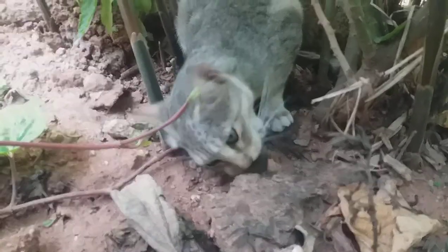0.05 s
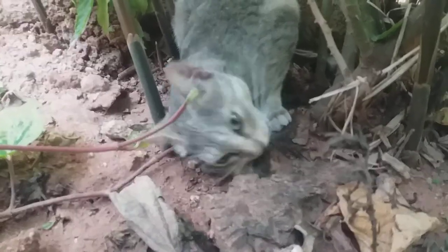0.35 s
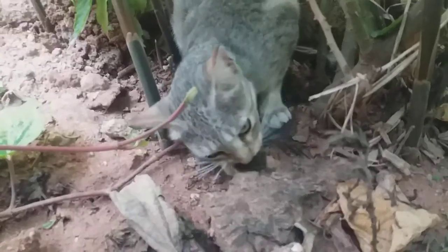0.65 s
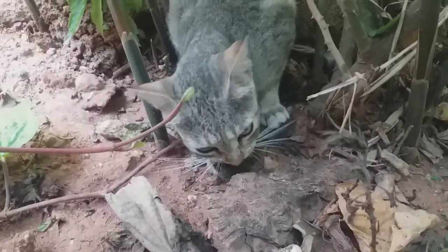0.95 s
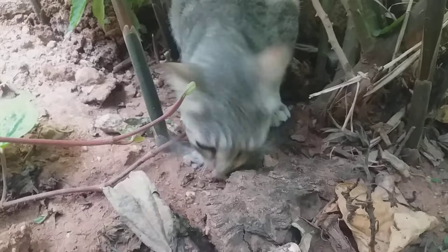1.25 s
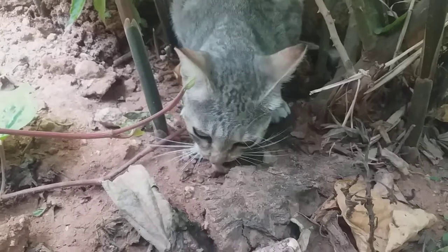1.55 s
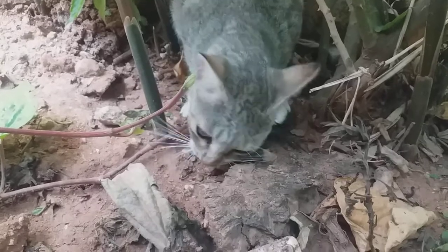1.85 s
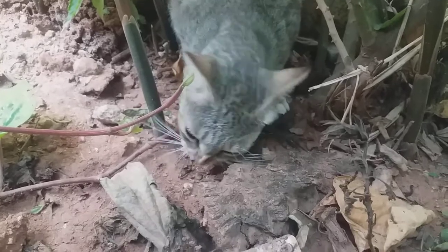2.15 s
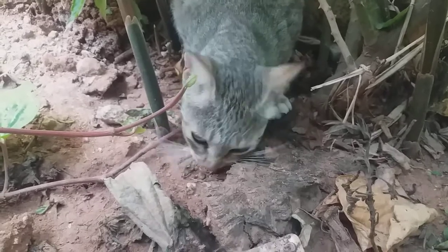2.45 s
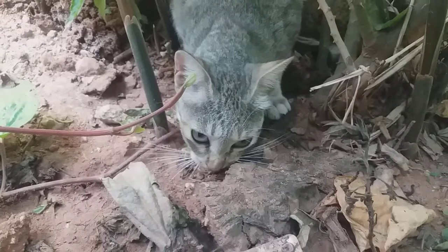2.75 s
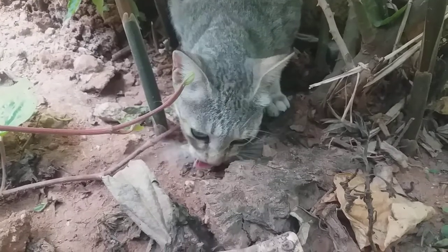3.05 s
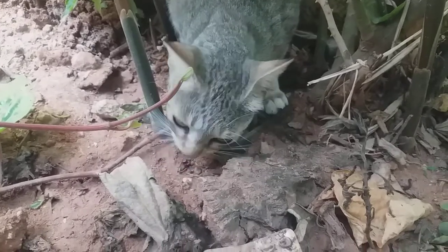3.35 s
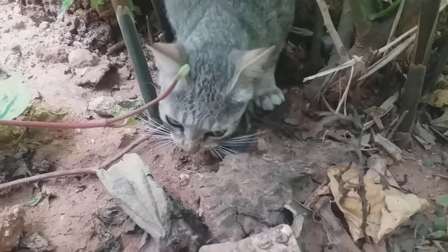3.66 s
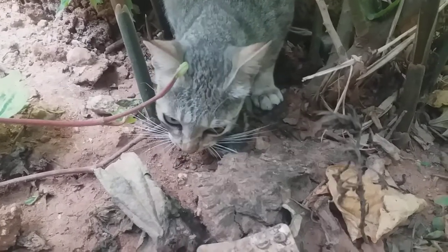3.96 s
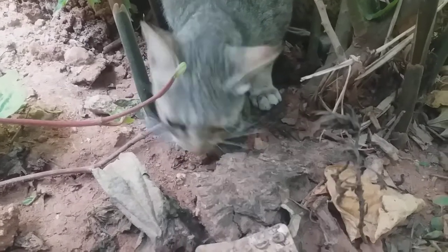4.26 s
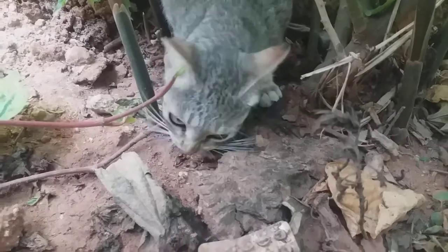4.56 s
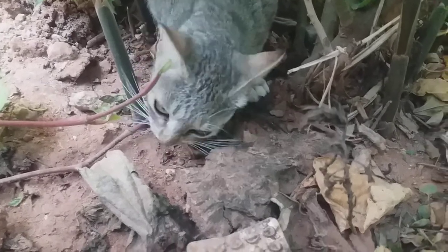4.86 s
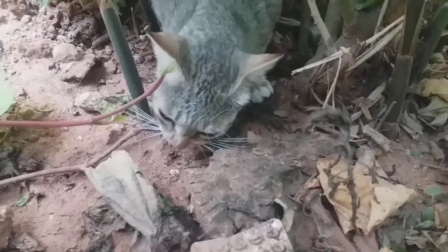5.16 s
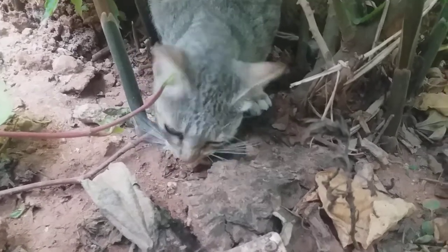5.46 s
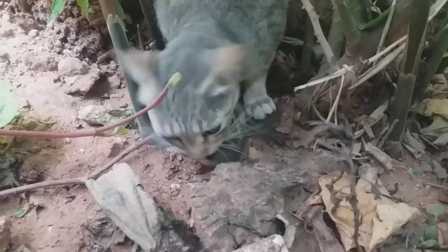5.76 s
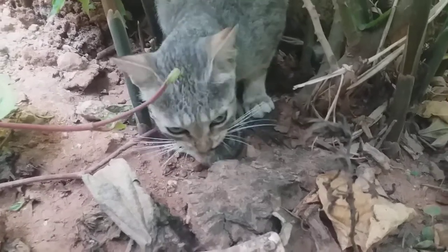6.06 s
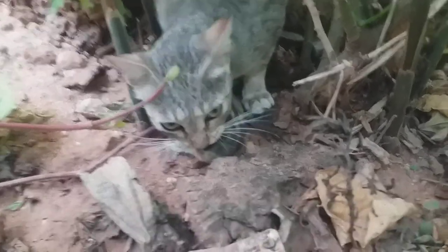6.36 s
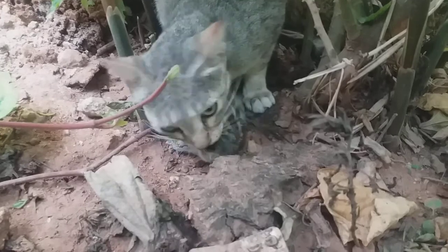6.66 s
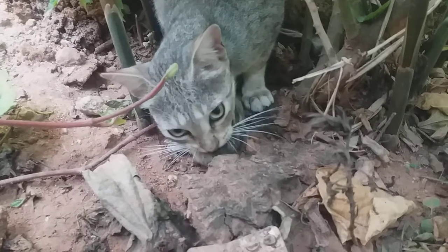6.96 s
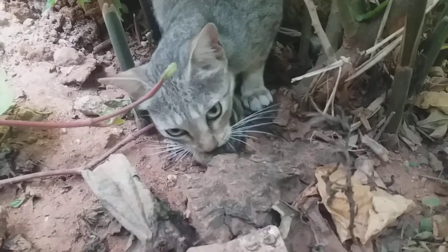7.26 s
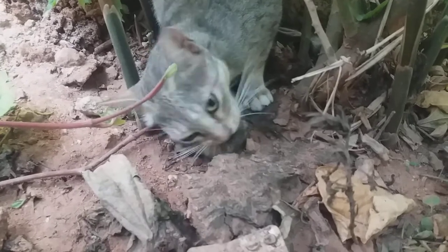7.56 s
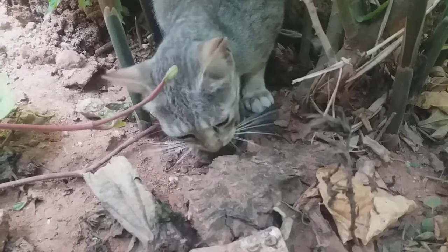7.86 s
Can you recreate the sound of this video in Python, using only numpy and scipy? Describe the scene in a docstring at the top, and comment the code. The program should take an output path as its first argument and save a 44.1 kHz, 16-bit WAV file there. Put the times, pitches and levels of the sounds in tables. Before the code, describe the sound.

A cat crunches its prey in short, uneven bouts, heard from close up against a quiet outdoor hush. Each bite gives a crisp crack and a dull thud, with some gristly scraping, soft dragging on soil and crackling leaf litter in between. Past the middle, a far bird gives a faint rising series of whistles. The loudest bite, a sharp double crack, follows, and the chewing then turns quieter and sparser.

```python
"""On dry soil and leaf litter outdoors, a cat chews small prey close to a microphone.
Sharp cracks sound close by, each with a low thud; teeth and twigs tick, gristle scrapes.
The prey bumps the ground and is dragged: stick-slip friction scuffs, tiny impacts rustle the leaves.
Behind it a far bird whistles a rising series in quiet air.
The loudest double crack makes the recorder turn its gain down for a while."""
import sys
import numpy as np
from scipy import signal
from scipy.fft import rfft, irfft
from scipy.io import wavfile
from scipy.ndimage import uniform_filter1d

SR = 44100
rng = np.random.default_rng(int(sys.argv[2]) if len(sys.argv) > 2 else 0)


def unload_audio(sound):
    """Save the sound as a 16-bit wav file, at the path given as the first command line argument."""
    columns = np.transpose(np.atleast_2d(sound))
    # keep every value between -1 and 1, then stretch to whole-number steps
    steps = np.round(np.clip(columns, -1, 1) * 32767)
    wavfile.write(sys.argv[1], SR, steps.astype(np.int16))


N = 353241

# Sharp cracks with a low thud; crack, clack and snap sound below their listed levels,
# and decay_s scales how long all but the thud ring:
# start_s, crack_db, crack_hz, thud_db, knock_db, clack_db, snap_db, decay_s
CRACKS = [(0.16, -29.5, 2200, -49, -46.5, -58, -54, 0.014), (0.253, -33, 2860, -48, -67, -58, -42, 0.01),
          (0.3472, -34, 2680, -43, -47, -42, -44.5, 0.056), (2.249, -35, 2450, -70, -39, -48, -46.5, 0.024),
          (2.2743, -29, 1550, -40, -36, -45, -60, 0.017),
          (2.5376, -29.5, 1350, -34.5, -32.5, -30.5, -42.5, 0.03),
          (2.642, -38.5, 2700, -46, -39.5, -50, -40, 0.015),
          (3.4381, -31, 2300, -35.5, -29.5, -45, -26, 0.011),
          (5.005, -39, 2330, -34, -28.5, -40, -58, 0.014), (5.0145, -30, 2320, -48, -41, -51, -46, 0.011),
          (5.4885, -30, 2560, -38, -48.5, -61, -41.5, 0.027),
          (5.5729, -30.5, 2340, -49, -47, -65, -43, 0.057), (5.869, -35.5, 2700, -41, -64, -51, -37, 0.018),
          (6.2688, -17, 1650, -25, -27, -23, -7, 0.01), (6.3063, -17, 1890, -21, -23, -18, -6.5, 0.018),
          (6.3336, -27, 2240, -28.5, -34.5, -47, -37, 0.024)]
# Modes of the thud under a crack: pitch_hz, relative_level_db, t60_s
THUD_MODES = [(94.5, -3, 0.13), (180.5, 3, 0.075), (213, 3, 0.061), (260, -15, 0.047)]
# Dry ticks of teeth and twigs: start_s, relative_level_db, pitch_hz
TICKS = [(0.003, -31, 2920), (0.1088, -34, 2090), (0.127, -40.5, 2200), (0.1508, -37, 2140),
         (0.177, -33, 2220), (0.1996, -36.5, 1820), (0.2092, -33, 2220), (0.2192, -32, 2090),
         (0.236, -38.5, 2400), (0.3187, -43.5, 2780), (0.3561, -36, 2830), (1.228, -48.5, 2140),
         (1.6427, -47, 1650), (1.822, -45, 1570), (2.2028, -38, 1970), (2.3269, -38.5, 1580),
         (2.4057, -34, 1100), (2.493, -49, 1400), (3.0035, -51, 1410), (3.122, -47, 2440),
         (3.136, -42, 2180), (4.1678, -37, 2330), (4.355, -43.5, 2790), (4.6143, -45, 2680),
         (4.8855, -45, 2820), (5.0877, -47, 1600), (5.3296, -44.5, 2370), (5.4066, -30.5, 2980),
         (5.5357, -38, 3520), (5.5992, -40, 2300), (6.377, -41, 2020), (6.385, -43, 1900),
         (7.4862, -39, 1850), (7.9022, -53, 3000)]
# Soft bumps against the ground: start_s, relative_level_db, pitch_hz
BUMPS = [(0.322, -32, 185), (2.146, -39.5, 275), (2.495, -41, 234), (3.004, -35, 133), (3.398, -32.5, 192),
         (4.356, -39, 183), (4.984, -34, 225), (5.845, -36.5, 180), (5.881, -37, 99), (5.935, -36.5, 157),
         (5.962, -34.5, 156), (6.567, -37, 106), (6.631, -41.5, 150), (6.669, -41.5, 411),
         (7.315, -34.5, 149), (7.374, -36.5, 126)]
# Gristle sliding between the teeth: start_s, length_s, level_db, pitch_hz
GNAWS = [(2.147, 0.028, -57, 560), (2.245, .019, -40, 730), (2.345, 0.036, -41.5, 625),
         (2.374, 0.062, -48.5, 584), (2.434, .044, -52, 540), (2.488, 0.031, -50, 420),
         (5.119, 0.095, -50.5, 504), (6.667, 0.035, -52.5, 460)]
# Tugs of the head that drag the prey, in relative levels: start_s, length_s, rub_db, rasp_db, leaves_db
TUGS = [(0.078, 0.16, -53, -55.5, -58.5), (0.184, 0.046, -50.5, -45, -58), (0.272, 0.045, -55, -55, -56),
        (0.33, 0.027, -54, -52, -46.5), (0.378, 0.069, -60, -62, -63), (0.62, 0.2, -68, -72, -67.5),
        (0.893, 0.19, -60, -67, -75), (2.133, 0.1, -57.5, -67, -67.5), (2.222, 0.086, -46, -53.5, -69),
        (2.326, 0.19, -44, -52, -60.5), (2.554, .21, -56, -66, -76.5), (2.987, 0.022, -63, -55, -60.5),
        (3.253, 0.05, -57, -57.5, -66), (3.372, 0.11, -54, -66, -59), (3.588, 0.024, -55, -55.5, -58.5),
        (3.634, 0.21, -61.5, -69, -77), (4.144, 0.22, -56, -54.5, -67), (4.403, 0.12, -55.5, -57, -64),
        (4.513, .11, -51, -54, -60), (4.698, 0.23, -57, -58.5, -65.5), (4.959, .09, -51, -51.5, -59.5),
        (5.05, 0.23, -58.5, -59, -66.5), (5.311, .22, -55.5, -55.5, -62), (5.565, 0.026, -53, -45.5, -46.5),
        (5.63, 0.053, -59, -57.5, -61.5), (5.828, 0.16, -46.5, -59.5, -65), (5.994, 0.098, -55.5, -69, -76),
        (6.142, 0.023, -59, -56, -61), (6.308, 0.031, -38, -47, -42.5), (6.349, 0.042, -42.5, -56, -55),
        (6.455, 0.14, -58, -65.5, -67), (6.655, 0.033, -46.5, -60, -62.5), (7.246, 0.1, -53, -67, -73.5)]
# Whistles of a far bird: start_s, top_pitch_hz, level_db
WHISTLES = [(4.93, 1370, -60), (5.29, 1520, -62), (5.658, 1580, -63), (6.0, 1655, -67)]

# Spectral envelopes: frequency_hz, gain_db
CRACK_SPECTRUM = [(250, -42.5), (700, -27), (1400, -1.5), (1800, -3.5), (2600, -3), (3500, -7),
                  (4800, -17.5), (5500, -25), (6300, -30), (7500, -38.5), (10000, -29)]  # sharp crack
KNOCK_SPECTRUM = [(60, -40), (150, -9.5), (290, 6), (390, 0.5), (500, -5), (680, 1.5), (820, -8),
                  (1200, -19.5), (2500, -45), (6000, -74.5)]  # hollow knock
CLACK_SPECTRUM = [(250, -60), (600, -26.5), (830, -7.5), (980, -3), (1220, -2.5), (1450, -6.5), (2200, -27),
                  (6000, -71.5)]  # hard midrange clack
SNAP_SPECTRUM = [(2500, -27.5), (4000, -16.5), (4900, -9.5), (5500, -26.5), (6200, -13), (7300, -26.5),
                 (10000, -12.5), (11500, -9), (14300, -3), (15200, -7), (16000, -7.5)]  # bright edge of a crack or tick
RUB_SPECTRUM = [(30, -31.5), (65, 1.5), (110, 7), (210, 2.5), (330, -6.5), (600, -36.5), (1500, -50)]  # low friction on soil
RASP_SPECTRUM = [(60, -35.5), (150, -15), (350, 2), (650, -3), (900, -6), (1400, -9.5), (2000, -10),
                 (3600, -29.5), (7000, -62.5)]  # midrange friction on soil
LEAF_SPECTRUM = [(530, -40), (900, -5), (1530, -5), (1660, -5), (2330, -4.5), (2760, -4.5), (3110, -9),
                 (4010, -11.5), (7140, -34), (8450, -39.5), (12000, -20), (16000, -25)]  # dry leaves and twigs
AIR_SPECTRUM = [(15, -57.5), (25, -18), (38, -27.5), (53, 0), (92, 0.5), (206, -4.5), (236, -11), (285, -7),
                (326, -9.5), (962, -16.5), (1190, -15.5), (2280, -17.5), (7110, -39.5), (12200, -31.5),
                (16000, -28.5)]  # outdoor hush

RUB_COLUMN, RASP_COLUMN, LEAVES_COLUMN = 2, 3, 4  # in TUGS


def cracks():
    """Impulsive excitation: a close crack, knock, clack and snap over the damped modes of a low thud."""
    out, t = np.zeros(N), np.arange(SR // 4) / SR
    for start_s, crack_db, crack_hz, thud_db, knock_db, clack_db, snap_db, decay_s in CRACKS:
        shifts = rng.normal(1, .05, len(THUD_MODES))  # the thud's pitch varies slightly
        thud = sum(amp(db) * decay(t, t60) * np.sin(2 * np.pi * hz * shift * t)
                   for (hz, db, t60), shift in zip(THUD_MODES, shifts))
        thud *= 1 - decay(t, t60=0.027)  # the thud swells in a little later
        crack = burst(t, CRACK_SPECTRUM, decay_s * 1.1, tail_db=-25, tail_t60=0.16)
        knock = burst(t, KNOCK_SPECTRUM, decay_s * 1.08, tail_db=-28, tail_t60=0.11)
        clack = burst(t, CLACK_SPECTRUM, decay_s * 0.13, tail_db=-32.5, tail_t60=0.055)
        snap = burst(t, SNAP_SPECTRUM, decay_s * 0.38, tail_db=-30, tail_t60=0.1)
        ring = resonate(crack, crack_hz, width_hz=350)
        add(out, start_s, amp(thud_db) * unit_blow(thud))
        add(out, start_s, amp(crack_db - 9) * unit_blow(ring + 0.56 * crack))
        add(out, start_s, amp(knock_db) * knock + amp(clack_db - 1.5) * clack + amp(snap_db - 5.5) * snap)
    return out


def burst(t, spectrum, t60, tail_db, tail_t60):
    """Noise transient: a decaying run of tiny impulses with a weak tail; longer runs build more slowly."""
    onset = 1 - decay(t, t60 / 2)
    force = onset * (decay(t, t60) + amp(tail_db) * decay(t, tail_t60))
    return unit_blow(colour(force * rng.choice([-1, 1], len(t)), spectrum))


def ticks():
    """Resonance: each small break rings its own twig or tooth, with a faint bright snap."""
    out, t = np.zeros(N), np.arange(SR // 6) / SR
    for start_s, level_db, pitch_hz in TICKS:
        tick = burst(t, LEAF_SPECTRUM, t60=.016, tail_db=-21.5, tail_t60=0.075)
        twig = resonate(tick, pitch_hz, width_hz=610)
        snap = burst(t, SNAP_SPECTRUM, t60=0.0072, tail_db=-18, tail_t60=.08)
        add(out, start_s, amp(level_db - 8) * (unit_blow(twig + 0.16 * tick) + amp(-23.5) * snap))
    return out


def bumps():
    """Damped oscillation: a soft push on the ground dies in seven cycles, with a little muffled grit."""
    out, t = np.zeros(N), np.arange(SR // 5) / SR
    for start_s, level_db, pitch_hz in BUMPS:
        envelope = (1 - decay(t, t60=0.033)) * decay(t, t60=7 / pitch_hz)
        push = envelope * np.sin(2 * np.pi * pitch_hz * t)
        grit = burst(t, KNOCK_SPECTRUM, t60=0.043, tail_db=-35, tail_t60=0.17)
        add(out, start_s, amp(level_db - 6) * (unit_blow(push) + 0.38 * grit))
    return out


def gnaws():
    """Cavity resonance: uneven slips of gristle ring the hollow of the mouth."""
    out = np.zeros(N)
    for start_s, length_s, level_db, pitch_hz in GNAWS:
        slips = rng.standard_normal(round(length_s * SR)) ** 3  # cubing makes the noise spiky
        mouth = resonate(colour(slips, KNOCK_SPECTRUM), pitch_hz, width_hz=330)
        add(out, start_s, amp(level_db) * unit_rms(mouth * signal.windows.tukey(len(slips), .7)))
    return out


def scuff():
    """Stick-slip friction: the prey drags over the soil with a low rub and a rasp."""
    slipping = amp(2.5 * wander(rate_hz=29))
    rub = unit_rms(colour(slipping * grains(per_s=1200, spread_db=0), RUB_SPECTRUM))
    rasp = unit_rms(colour(slipping * grains(per_s=2500, spread_db=2.5), RASP_SPECTRUM))
    return amp(0.1) * tug_envelope(RUB_COLUMN) * rub + amp(-3.03) * tug_envelope(RASP_COLUMN) * rasp


def rustle():
    """Superposed impacts: dry leaves crackle in clumps over a finer brushing, and crumbs crunch."""
    crackle = unit_rms(grains(per_s=1100, spread_db=3.2) * amp(3.5 * wander(rate_hz=90)))
    brushing = unit_rms(grains(per_s=6700, spread_db=-3.5))
    crumb_decay = decay(np.arange(SR // 20) / SR, t60=.018)
    crumbs = signal.oaconvolve(abs(grains(per_s=40, spread_db=2)), crumb_decay)[:N]
    crunch = unit_rms(crumbs * rng.choice([-1, 1], N))
    leaves = unit_rms(colour(crackle + .7 * crunch + .45 * brushing, LEAF_SPECTRUM))
    return amp(1.85) * tug_envelope(LEAVES_COLUMN) * leaves


def tug_envelope(column, attack_s=0.018, release_t60=0.23):
    """Incoherent addition: tugs sum in power; each takes hold, holds, then the litter settles."""
    power, t = np.zeros(N), np.arange(SR) / SR
    for tug in TUGS:
        start_s, length_s = tug[:2]
        envelope = np.minimum(t / attack_s, 1) * decay(np.maximum(t - length_s, 0), release_t60)
        add(power, start_s, (amp(tug[column]) * envelope) ** 2)
    return np.sqrt(power)


def bird(length_s=.19, top_s=0.15, flat_share=.08):
    """Scattering: far whistles, each arching up from a flat start, gain a diffuse tail among trees."""
    out, t = np.zeros(N), np.arange(0, length_s, 1 / SR)
    arch = 1 - flat_share * (t / top_s - 1) ** 2
    for start_s, top_pitch_hz, level_db in WHISTLES:
        tone = np.sin(2 * np.pi * np.cumsum(top_pitch_hz * arch) / SR)
        add(out, start_s, amp(level_db) * signal.windows.tukey(len(t), .6) * tone)
    out *= amp(3 * wander(rate_hz=35))  # the level flickers
    trees = rng.standard_normal(SR // 2) * decay(np.arange(SR // 2) / SR, t60=0.354)
    return out + 0.48 * signal.oaconvolve(out, trees / np.linalg.norm(trees))[:N]


def air(level_db=-59.5):
    """Amplitude-modulated noise: a steady outdoor hush with a slight flutter."""
    hush = rng.standard_normal(N) * amp(.6 * wander(rate_hz=30))
    return amp(level_db) * unit_rms(colour(hush, AIR_SPECTRUM))


def grains(per_s, spread_db):
    """Poisson process: tiny impacts at random times, with an exponential spread of levels."""
    size = amp(spread_db * np.minimum(rng.exponential(1, N), 4))
    return size * rng.choice([-1, 1], N) * (rng.random(N) < per_s / SR)


def wander(rate_hz):
    """Band-limited noise: a slow fluctuation of rms one."""
    passband = np.fft.rfftfreq(N, 1 / SR) < rate_hz
    return unit_rms(irfft(rfft(rng.standard_normal(N)) * passband, N))


def colour(x, spectrum, size=4096):
    """Minimum-phase filtering: imposes a spectrum causally, so that attacks stay sharp."""
    frequency_hz, gain_db = np.transpose(spectrum)
    bins_hz = abs(np.fft.fftfreq(size, 1 / SR))
    log_gain = np.log(amp(np.interp(np.log(bins_hz + 1), np.log(frequency_hz + 1), gain_db)))
    response = np.exp(np.conj(signal.hilbert(log_gain)))
    taps = np.fft.ifft(response).real[:size // 2]
    return signal.oaconvolve(x, taps)[:len(x)]


def resonate(x, pitch_hz, width_hz):
    """Second-order resonance with a peak gain of one."""
    return signal.lfilter(*signal.iirpeak(pitch_hz, pitch_hz / width_hz, SR), x)


def decay(t, t60):
    """Exponential damping: 60 dB lost in t60 seconds."""
    return amp(-60 * t / max(t60, 1e-3))


def amp(db):
    """Decibels to amplitude ratio."""
    return 10 ** (np.asarray(db) / 20)


def unit_rms(x):
    """Normalisation to an rms of one."""
    return x / np.sqrt(np.mean(x ** 2) + 1e-20)


def unit_blow(x):
    """Normalisation of a blow: its loudest 4 ms have an rms of one."""
    return x / np.sqrt(uniform_filter1d(x ** 2, 176).max())


def add(mix, start_s, sound):
    """Superposition: a sound joins the mix at start_s."""
    part = mix[max(round(start_s * SR), 0):][:len(sound)]
    part += sound[:len(part)]


def gain_control(x, threshold_db=-22, lag_s=0.39, recovery_db_per_s=7):
    """Automatic gain control: a very loud crack eases the gain down, and it slowly comes back."""
    level_db = 10 * np.log10(abs(uniform_filter1d(x[0] ** 2, 176)) + 1e-12)
    recovery_db = recovery_db_per_s * np.arange(N) / SR
    held_peak_db = np.maximum.accumulate(level_db + recovery_db) - recovery_db
    excess_db = np.maximum(held_peak_db - threshold_db, 0)
    pole = np.exp(-1 / (lag_s * SR))
    return x * amp(-signal.lfilter([1 - pole], [1, -pole], excess_db))


def scene():
    """Linear superposition of all sources at one microphone."""
    return (cracks() + ticks() + bumps() + gnaws() + rustle() + scuff() + bird() + air())[None]


def record(dry, low_cut_hz=48, high_cut_hz=16050):
    """Band limiting: the microphone sheds deep bass; the recorder controls gain and cuts the top."""
    highpass = signal.butter(3, low_cut_hz, "highpass", fs=SR, output="sos")
    lowpass = signal.firwin(301, high_cut_hz, window=("kaiser", 9), fs=SR)
    controlled = gain_control(signal.sosfilt(highpass, dry))
    return signal.oaconvolve(controlled, lowpass[None], "same")


dry = scene()
out = record(dry)
unload_audio(out)
```